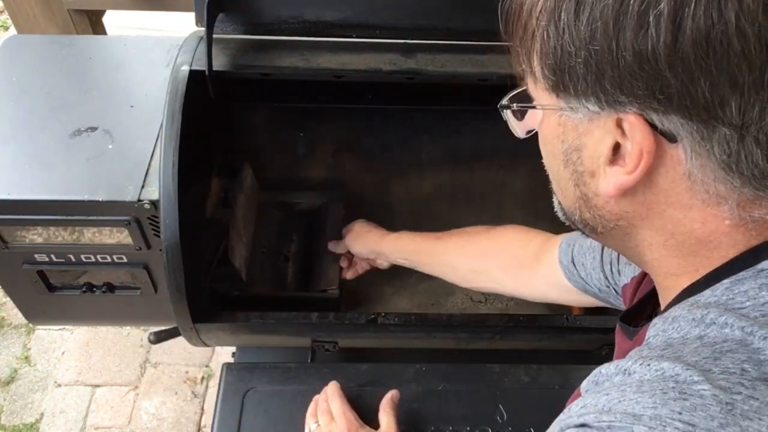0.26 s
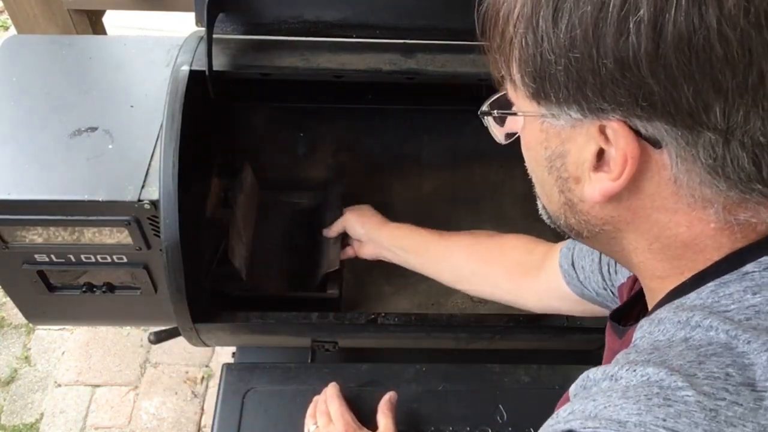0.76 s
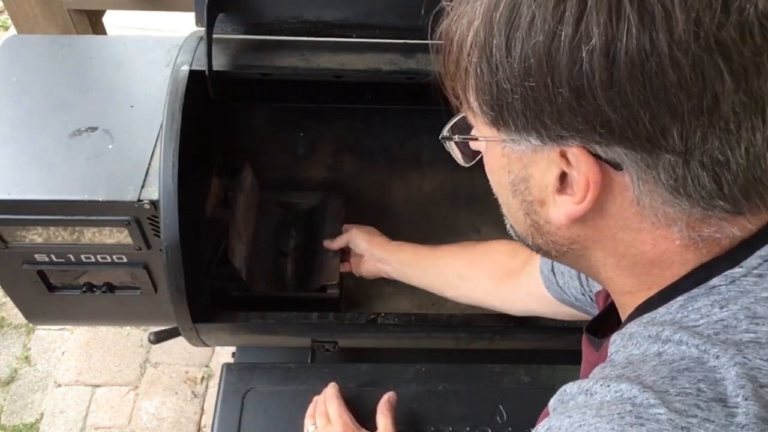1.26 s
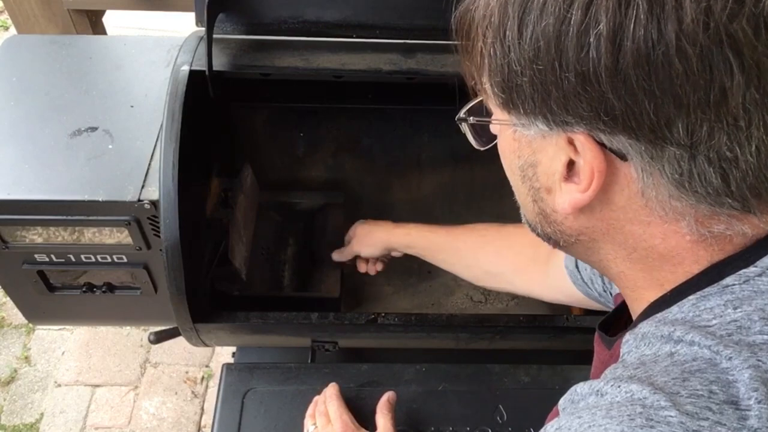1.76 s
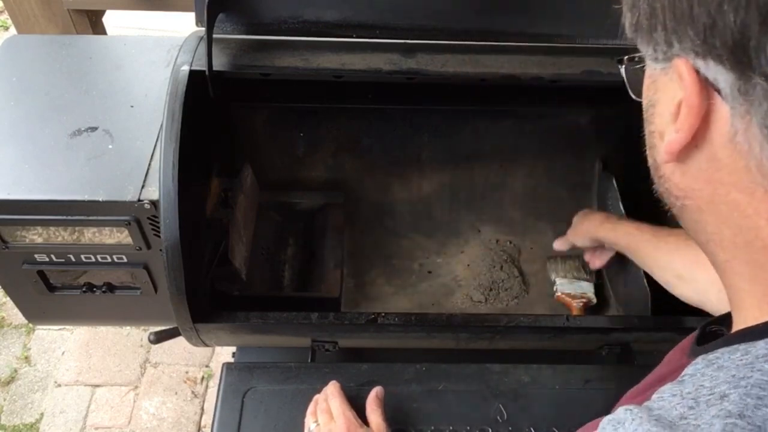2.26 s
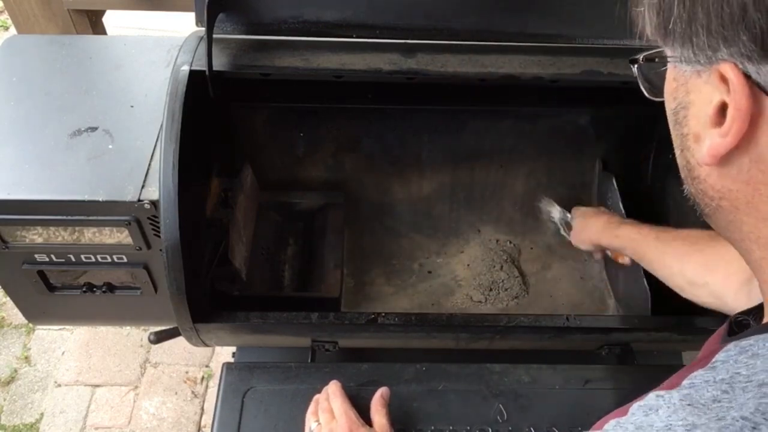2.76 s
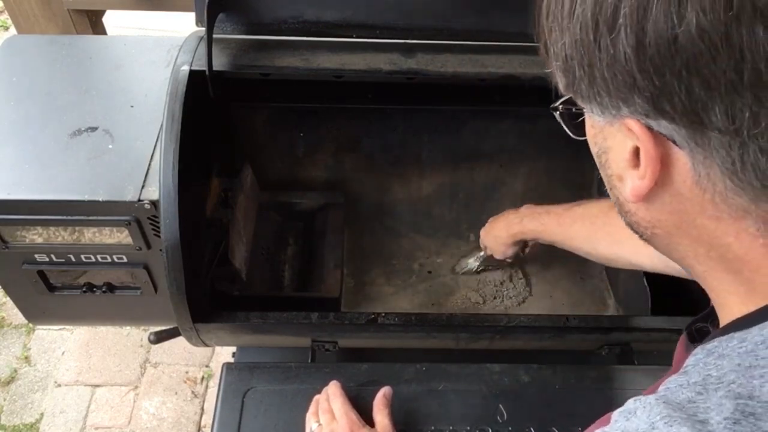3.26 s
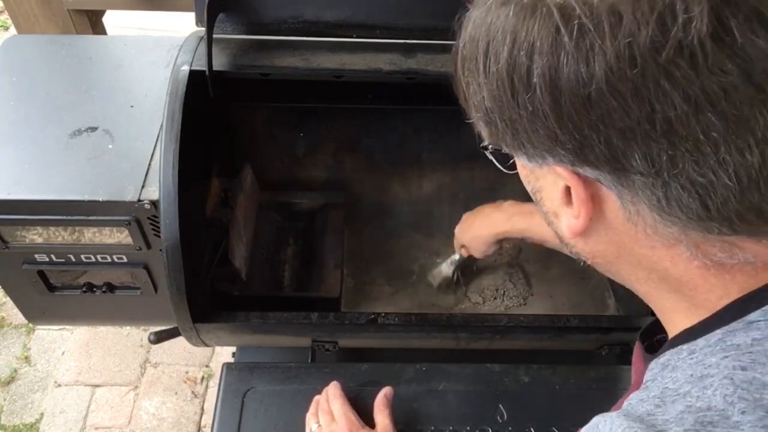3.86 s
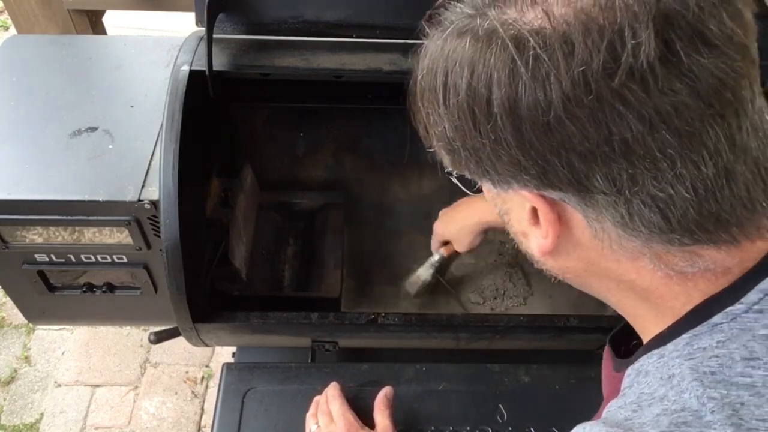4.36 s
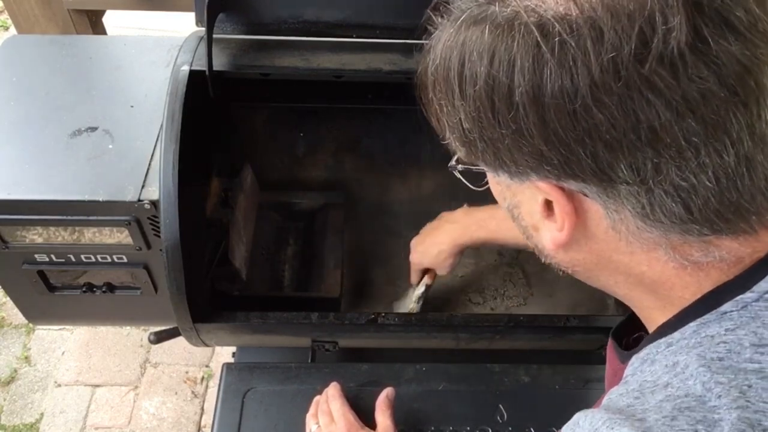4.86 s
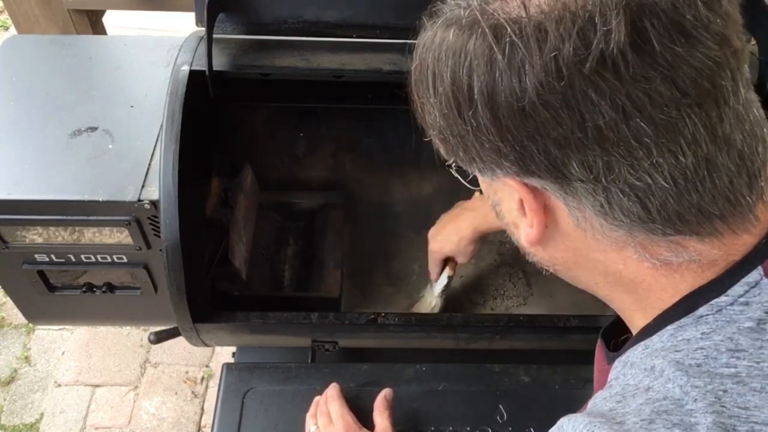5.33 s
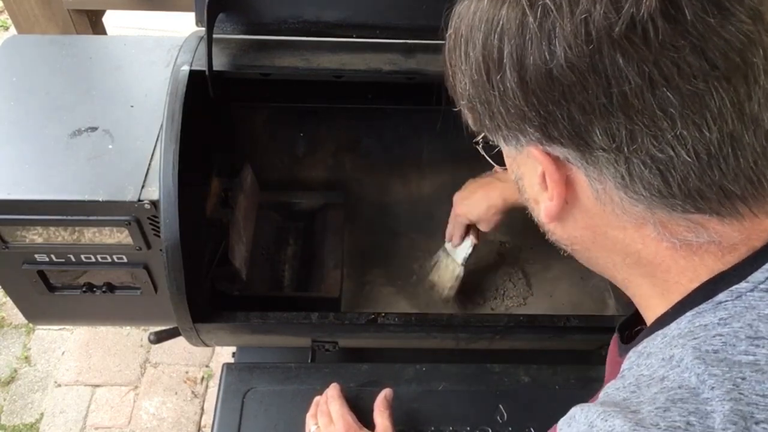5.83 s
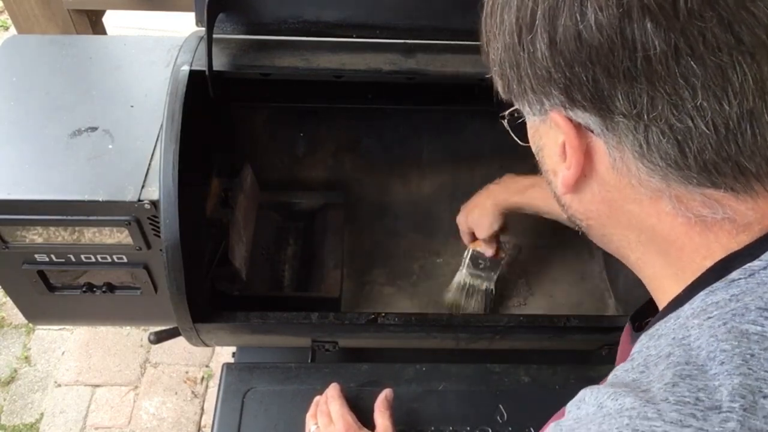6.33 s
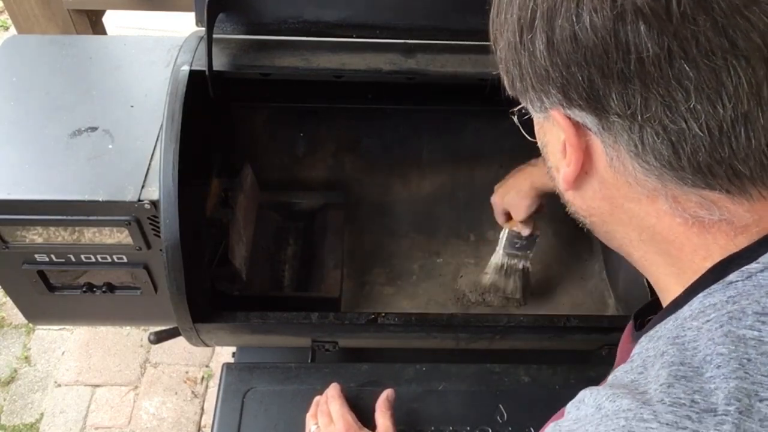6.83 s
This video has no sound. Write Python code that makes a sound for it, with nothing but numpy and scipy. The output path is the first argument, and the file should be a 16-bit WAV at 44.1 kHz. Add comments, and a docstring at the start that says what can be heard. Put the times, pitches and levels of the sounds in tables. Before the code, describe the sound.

A loose steel plate scrapes and clanks loudly into place inside a hollow metal barrel, then a brush sweeps ash in soft strokes over a faint fan hum.

```python
"""Outdoors in a yard, one microphone: a fan unit hums steadily, as air noise under slightly unsteady tones.
From about 2 s a faint insect chirps about twice a second, in swells of narrow-band noise.
Up front, a loose steel plate is worked into its seat inside a barrel grill: it scrapes (noisy slips ringing
its modes), clanks (struck modes over the barrel's answer), drops home and rings on in decaying sines.
Then a paintbrush sweeps ash over the barrel floor in soft strokes of coloured noise, with a few light taps."""
import sys
import numpy as np
from scipy import signal
from scipy.fft import rfft, irfft, next_fast_len
from scipy.io import wavfile
from scipy.ndimage import map_coordinates

SR = 44100
rng = np.random.default_rng(int(sys.argv[2]) if len(sys.argv) > 2 else 0)


def wrap_up_sound(samples):
    """Save the sound to the file named by the first command line argument, as 16-bit audio."""
    columns = np.atleast_2d(samples).T
    # keep every value between -1 and 1, then stretch to whole-number steps
    tamed = np.clip(columns, -1, 1)
    steps = np.round(tamed * 32767).astype(np.int16)
    wavfile.write(sys.argv[1], SR, steps)


N = 312669
TIME = np.arange(N) / SR
RING_TIME = TIME[:round(.4 * SR)]  # the span of one blow or chirp


def amp(db):
    """Turn decibels into a linear gain."""
    return 10 ** (np.asarray(db) / 20)


def unit(x):
    """Scale x to rms 1."""
    return x / np.sqrt(np.mean(x ** 2) + 1e-20)


def struck(x):
    """Scale a blow to the energy of 35 ms at rms 1."""
    return x / np.sqrt(np.sum(x ** 2) / (.035 * SR) + 1e-20)


def along(points, hz):
    """Read a curve of (f/Hz, value) points, interpolated on a log frequency axis."""
    point_hz, values = np.transpose(points)
    return np.interp(np.log(hz + 1), np.log(point_hz + 1), values)


def wobble(rate):
    """A smooth random curve, rate knots a second."""
    knots = rng.standard_normal(int(N * rate / SR) + 4)
    return map_coordinates(knots, [TIME * rate])


def filtered(x, response):
    """Multiply the spectrum of x by a response of frequency."""
    size = next_fast_len(len(x) + 8192)
    hz = np.fft.rfftfreq(size, 1 / SR)
    return irfft(rfft(x, size) * response(hz), size)[:len(x)]


def coloured(x, spectrum):
    """Shape x by the given spectrum, at rms 1."""
    return unit(filtered(x, lambda hz: amp(along(spectrum, hz))))


def patchy(x, depth_db, width_hz):
    """Crowded resonances: random peaks and valleys, about width_hz apart."""
    knots = rng.standard_normal(2048)
    return filtered(x, lambda hz: amp(depth_db * map_coordinates(knots, [hz / width_hz], mode='wrap')))


def grit(rate):
    """Tiny catches of random size, about rate a second."""
    return (rng.random(N) < rate / SR) * rng.standard_normal(N)


def push(start, length, attack, release, ease_db):
    """One move of the hand: it gathers speed, eases off by ease_db a second, and dies away after its length."""
    t = np.maximum(TIME - start, 0)
    rise = np.sin(np.pi / 2 * np.minimum(t / attack, 1))
    fall = np.exp(-np.maximum(t - length, 0) / release)
    return rise * amp(-ease_db * t) * fall


def add(track, s, sound):
    """Mix a sound in at s seconds."""
    part = track[round(s * SR):][:len(sound)]
    part += sound[:len(part)]


# spectrum of the open air with the fan's rumble: f/Hz, relative level/dB per Hz
AIR_SPECTRUM = [(15, -48), (25, -42), (43, -19), (53, -9.5), (76, -5), (92, -3.5), (117, -3.5), (285, -10),
                (439, -21.5), (734, -21.5), (936, -29), (1650, -31), (1790, -33), (8590, -45), (16000, -52)]
# steady tones of the fan unit: f/Hz, level/dB rms before their wobble
FAN_TONES = [(70.1, -53), (120, -58), (175.4, -65), (246, -65), (283, -65.5), (600, -74.5), (648, -79.5),
             (886, -77), (1120, -78.5), (1179, -82), (1238, -76.5)]


def yard(air_db=-50):
    """A fan unit's rumble and slightly unsteady tones in the open air."""
    air_level = amp(air_db + 0.17 * wobble(2.1))
    air = air_level * coloured(rng.standard_normal(N), AIR_SPECTRUM)
    tones = np.zeros(N)
    for hz, db in FAN_TONES:
        level = amp(db + 2.3 * wobble(4.4))
        tones += level * np.sin(2 * np.pi * hz * TIME + 0.94 * wobble(4))
    return air + np.sqrt(2) * tones  # from rms to peak


# insect chirps: t/s of the middle, level/dB at the top of the swell
CHIRPS = [(1.998, -79.5), (2.409, -80.5), (2.85, -80), (3.3, -79), (3.92, -78), (4.35, -75), (4.78, -70),
          (5.25, -71.5), (5.72, -71), (6.2, -70), (6.641, -70), (7.08, -71.5)]
CHIRP_HZ = 8390


def insect(spread_s=0.047, width_hz=90):
    """Each chirp is a short swell of rasping in one narrow wing resonance."""
    out = np.zeros(N)
    middle = RING_TIME.mean()
    swell = np.exp(-.5 * ((RING_TIME - middle) / spread_s) ** 2)
    for s, db in CHIRPS:
        noise = rng.standard_normal(len(RING_TIME))
        rasp = unit(filtered(noise, lambda hz: 1 / (1 + ((hz - CHIRP_HZ) / width_hz) ** 2)))
        add(out, s - middle, amp(db) * rasp * swell)
    return out


# brush strokes: start t/s, length/s, bristle hiss level/dB, rub on the steel level/dB (before easing)
STROKES = [(2.425, 0.23, -69.5, -74), (2.627, .08, -61.5, -76), (2.82, 0.1, -74, -76),
           (2.954, 0.31, -58.5, -61), (3.635, 0.074, -61, -64.5), (3.72, 0.1, -58, -66),
           (4.126, 0.11, -60, -74), (4.196, 0.084, -58, -66), (4.546, 0.092, -61.5, -64),
           (4.639, 0.25, -57.5, -63), (5.114, 0.046, -60.5, -69), (5.225, .1, -60, -62),
           (5.587, .08, -66, -72), (5.665, 0.082, -58.5, -61), (5.904, .08, -64.5, -75.5),
           (6.155, 0.054, -62, -64), (6.245, 0.083, -60.5, -59.5), (6.583, 0.091, -68, -70),
           (6.667, 0.058, -51.5, -55.5), (7.03, 0.036, -68, -68)]
# spectrum of the bristle hiss: f/Hz, relative level/dB per Hz
BRISTLE_SPECTRUM = [(3000, 1.5), (4500, -1), (7000, -3), (10000, -3.5), (13000, -3), (15500, -13.5)]
# spectrum of the rub on the steel: f/Hz, relative level/dB per Hz
RUB_SPECTRUM = [(300, 9), (700, 3), (1200, 2.5), (2100, -3), (3100, 6), (4200, -1.5), (6000, -30)]
# light taps of the brush on the steel: t/s, bright tick level/dB, dull knock level/dB
TAPS = [(2.841, -72.5, -84), (2.977, -75, -56.5), (5.151, -76, -65), (7.048, -77, -62)]
STROKE_ATTACK_S, STROKE_RELEASE_S, STROKE_EASE_DB_PER_S = 0.049, 0.037, 14.5
TAP_RISE_S = 0.0087


def brush(drag_hiss_db=-77, drag_rub_db=-72):
    """Bristles flick through the ash and rub the steel, drag lightly between strokes and sometimes tap."""
    dragging = np.clip(TIME - STROKES[0][0] + .5, 0, .5) / .5  # fades in over 0.5 s up to the first stroke
    hiss = amp(drag_hiss_db) * dragging
    rub = amp(drag_rub_db) * dragging
    for s, length, hiss_db, rub_db in STROKES:
        speed = push(s, length, STROKE_ATTACK_S, STROKE_RELEASE_S, STROKE_EASE_DB_PER_S)
        hiss = np.hypot(hiss, amp(hiss_db) * speed)
        rub = np.hypot(rub, amp(rub_db) * speed)
    out = np.zeros(N)
    for spectrum, level in [(BRISTLE_SPECTRUM, hiss), (RUB_SPECTRUM, rub)]:
        flicks = rng.standard_normal(N) + .7 * unit(grit(rate=1800))
        flicks = patchy(flicks, depth_db=1.3, width_hz=80)
        out += coloured(flicks, spectrum) * level * amp(.6 * wobble(53))
    for s, tick_db, knock_db in TAPS:
        cushion = 1 - np.exp(-RING_TIME / TAP_RISE_S)
        tap = steel(modes_db=-22) * amp(-250 * RING_TIME) * cushion  # quickly damped
        tick = struck(np.diff(tap, prepend=0))  # differencing brightens it
        add(out, s, amp(tick_db) * tick + amp(knock_db) * struck(tap))
    return out


# soft low knocks, small 1 kHz clinks and hollow booms from plate or brush:
# t/s, tone f/Hz, tone level/dB, boom level/dB
KNOCKS = [(0.015, 479, -43.5, -29), (0.224, 449, -30, -45.5), (0.759, 462, -39, -38),
          (0.887, 979, -32, -31.5), (1.039, 967, -21.5, -45), (1.207, 486, -31, -38),
          (1.38, 457, -29, -38.5), (1.5, 467.7, -24.5, -31), (7.042, 463, -70, -38)]
# spectrum of the barrel's hollow boom: f/Hz, relative level/dB per Hz
HOLLOW_SPECTRUM = [(30, -39.5), (90, -10), (135, -2), (165, -7), (240, -0.5), (400, -22), (2000, -37.5),
                   (8000, -78)]
BOOM_T60 = .5  # s


def knocks_and_booms(tone_t60=0.16, rise=0.007):
    """Each knock or clink is one decaying sine, over a hollow boom of decaying noise (times in s)."""
    out = np.zeros(N)
    swell = 1 - np.exp(-RING_TIME / rise)
    for s, tone_hz, tone_db, boom_db in KNOCKS:
        tone = amp(-60 * RING_TIME / tone_t60) * np.sin(2 * np.pi * tone_hz * RING_TIME)
        noise = coloured(rng.standard_normal(len(RING_TIME)), HOLLOW_SPECTRUM)
        boom = amp(-60 * RING_TIME / BOOM_T60) * noise
        add(out, s, (amp(tone_db) * struck(tone) + amp(boom_db) * boom) * swell)
    return out


# spectrum of the barrel's clatter: f/Hz, relative level/dB per Hz
CLATTER_SPECTRUM = [(53, -49.5), (90, -11), (244, -8), (376, -17.5), (467, -7), (510, -10.5), (786, -8.5),
                    (998, 1), (1910, -6), (2430, -6.5), (3150, -5), (6300, -10.5), (6870, -11.5),
                    (14400, -22.5), (16000, -38)]
# how long the barrel rings: f/Hz, t60/s
BARREL_DECAY = [(130, 1), (500, 0.34), (1500, 0.22), (5000, 0.13), (14000, .15)]


def barrel():
    """The crowded modes of the barrel, new for each point of contact; each band dies at its own speed."""
    modes = patchy(rng.standard_normal(len(RING_TIME)), depth_db=6, width_hz=35)
    hz, t, bands = signal.stft(coloured(modes, CLATTER_SPECTRUM), SR, nperseg=256)
    t60 = along(BARREL_DECAY, hz)[:, None]
    answer = signal.istft(bands * amp(-60 * t / t60), SR, nperseg=256)[1]
    return struck(answer[:len(RING_TIME)])


# plate modes: f/Hz before detuning, relative level/dB before random strengths, t60/s before hand damping
PLATE_MODES = [(467, -5, .27), (556, -9, .25), (651, -11, .3), (870, 2, .2), (982, 5, .24), (1039, -3, .3),
               (1164, 3, .2), (1274, 0, .18), (1594, -2, .18), (1692, -3, .25), (2051, -7, .18),
               (2229, -7, .18), (2355, -4, .2), (2501, -5, .24), (3015, -7, .22), (3462, -6, .23),
               (3560, -6, .25), (3895, -2, .19), (4339, -4, .2), (4546, -2, .19), (5141, -4, .16),
               (5426, -4, .15), (5830, -3, .15), (6615, 0, .16), (6816, -2, .16), (7009, -4, .15),
               (8333, -7, .17), (8742, -5, .15), (8990, -3, .14), (10370, -9, .16)]


def steel(modes_db):
    """One contact: the plate's modes at new strengths, over the barrel's answer."""
    hz, db, t60 = np.transpose(PLATE_MODES)[:, :, None]
    size = amp(db + 3 * rng.standard_normal(hz.shape))
    # the shifting grip detunes the plate a little
    hz = hz * (1 + .0015 * rng.standard_normal(hz.shape))
    phase = 2 * np.pi * (hz * RING_TIME + rng.random(hz.shape))
    decay = np.exp(-np.log(1000) * RING_TIME / t60)
    ring = np.sum(size * decay * np.sin(phase), axis=0)
    return struck(amp(modes_db) * struck(ring) + barrel())


# the plate sliding on its ledge: start t/s, length/s, force level/dB before easing
SLIDES = [(0, 0.062, -47.5), (0.529, 0.11, -29), (0.629, .055, -33), (0.756, .38, -49), (1.154, .06, -48.5),
          (1.351, .07, -48.5), (1.48, .07, -35.5)]
SLIDE_ATTACK_S, SLIDE_RELEASE_S, SLIDE_EASE_DB_PER_S = 0.0092, 0.028, 16.5


def scrape(count=18, catches_per_s=750, damping_db_per_s=110):
    """The sliding edge catches and slips; slips ring the plate, in a new colour as the contact moves."""
    force = np.zeros(N)
    for s, length, db in SLIDES:
        force += amp(db) * push(s, length, SLIDE_ATTACK_S, SLIDE_RELEASE_S, SLIDE_EASE_DB_PER_S)
    slips = unit(grit(rate=catches_per_s)) * force
    seated = round(1.8 * SR)  # no slips after this
    out = np.zeros(N)
    for stretch in np.array_split(np.arange(seated), count):
        ring = steel(modes_db=-5.5) * amp(-damping_db_per_s * RING_TIME)  # pressure on the edge damps the ring
        ring = ring / np.linalg.norm(ring)
        add(out, TIME[stretch[0]], signal.fftconvolve(slips[stretch], ring))
    return out


# plate contacts: t/s, thud level/dB, clang level/dB, clink level/dB
CONTACTS = [(0.057, -37.5, -42.5, -64.5), (0.088, -41, -39, -39.5), (0.133, -35.5, -37, -51.5),
            (0.157, -35.5, -44, -51.5), (0.199, -34.5, -32, -43), (0.214, -29, -23, -36),
            (0.226, -26.5, -24.5, -43.5), (0.238, -34.5, -38.5, -60), (0.497, -47.5, -39.5, -48),
            (0.535, -41.5, -34.5, -34), (0.628, -35.5, -24.5, -22.5), (0.641, -29.5, -24, -46),
            (0.751, -35, -32, -49.5), (0.846, -33.5, -33, -28), (0.893, -29, -31.5, -48),
            (0.966, -38.5, -39.5, -38), (1.042, -31, -27, -38.5), (1.057, -31, -33.5, -43),
            (1.183, -38, -39.5, -56), (1.2, -35, -37.5, -52.5), (1.379, -39.5, -47.5, -71.5),
            (1.443, -35, -26.5, -42.5), (1.465, -25, -19.5, -21.5), (1.483, -30, -16.5, -23),
            (1.504, -40.5, -23, -33)]
# the plate rings on when it hangs free: t/s, f/Hz, level/dB at the start, t60/s
FREE_RING = [(0.844, 3009, -27, 0.21), (0.847, 3558, -32, 0.37), (0.846, 4339, -29, 0.27),
             (0.848, 5310, -27.5, 0.2), (0.849, 10370, -42.5, 0.29), (1.483, 467, -45.5, 1.1),
             (1.483, 1044, -33, 0.55), (1.483, 1690, -42.5, 1.63), (1.485, 2509, -38.5, .45),
             (1.484, 3569, -53, 1.05)]


def clanks(attack=0.00018, slowest=.003, grip_db_per_s=20):
    """Flat blows thud and clang; edge contacts clink; the hand's grip damps them a little (times in s)."""
    edges_hz = [(100, 600), (600, 2400), (2400, 18000)]  # thud, clang, clink
    bands = [signal.butter(3, edges, 'band', fs=SR, output='sos') for edges in edges_hz]
    out = np.zeros(N)
    for s, thud_db, clang_db, clink_db in CONTACTS:
        rise = min(attack * amp(clang_db - clink_db), slowest)  # duller contacts build up more slowly
        blow = steel(modes_db=-3) * (1 - np.exp(-RING_TIME / rise))
        blow = blow * amp(-grip_db_per_s * RING_TIME)
        for band, db in zip(bands, [thud_db, clang_db, clink_db]):
            add(out, s, amp(db) * struck(signal.sosfilt(band, blow)))
    t = TIME[:2 * SR]
    for s, hz, db, t60 in FREE_RING:
        add(out, s, amp(db - 60 * t / t60) * np.sin(2 * np.pi * hz * t))
    return out


def scene():
    """Yard, insect, brush and plate at one microphone."""
    background = yard() + insect()
    plate = scrape() + clanks()
    return (background + brush() + knocks_and_booms() + plate)[None]


TOP_HZ = 15900


def record(dry):
    """The recorder rounds off the highest peaks and keeps nothing above its band limit."""
    rounded = dry / (1 + (dry / .5) ** 6) ** (1 / 6)  # peaks stay below 0.5
    return np.array([filtered(x, lambda hz: hz < TOP_HZ) for x in rounded])


dry = scene()
out = record(dry)
wrap_up_sound(out)
```